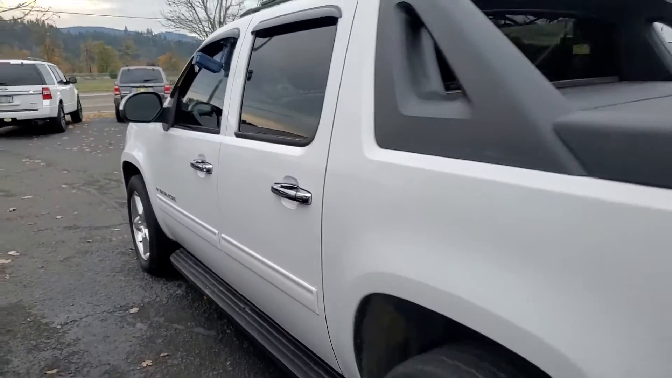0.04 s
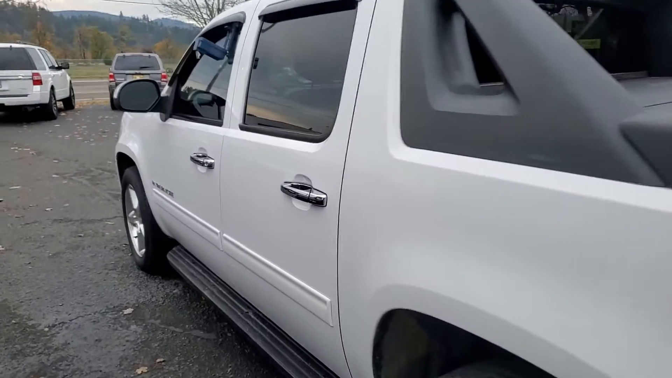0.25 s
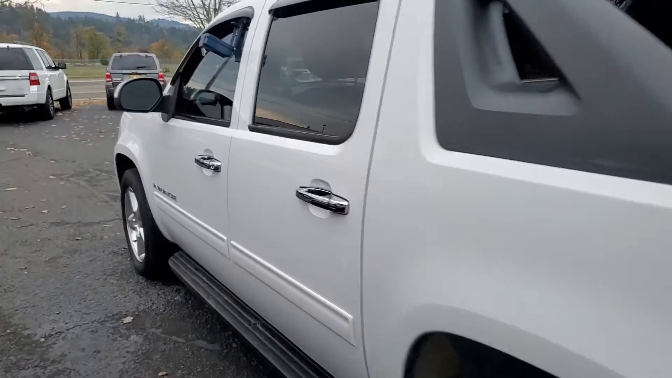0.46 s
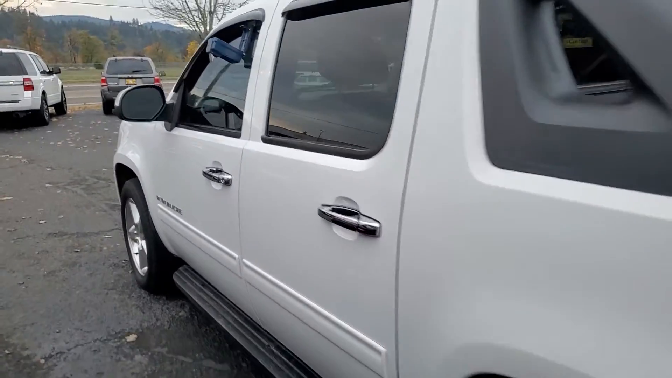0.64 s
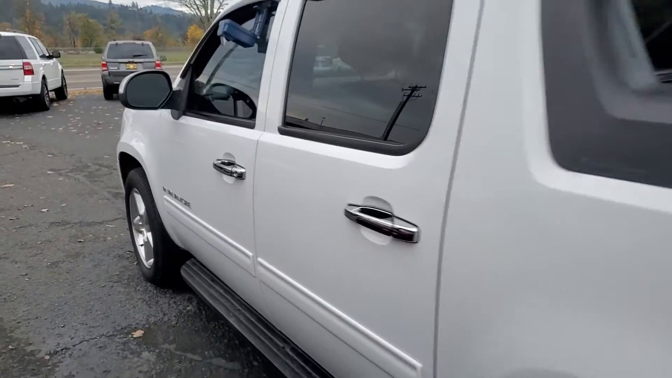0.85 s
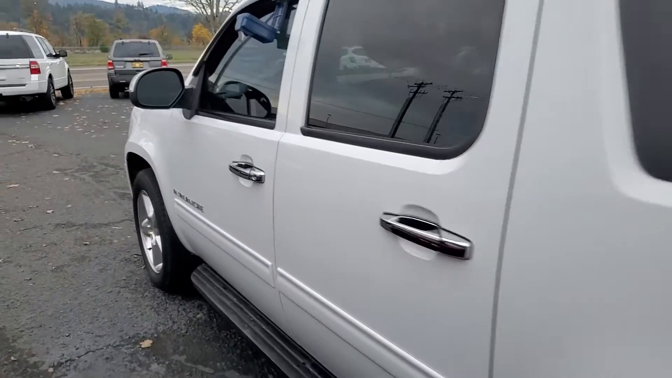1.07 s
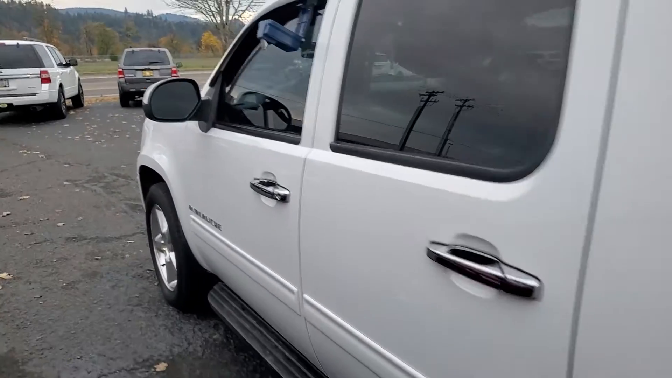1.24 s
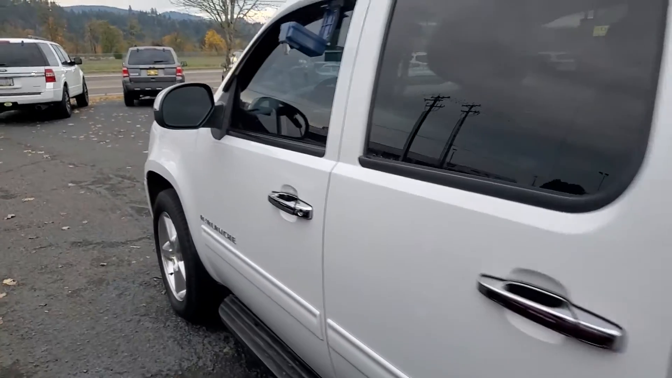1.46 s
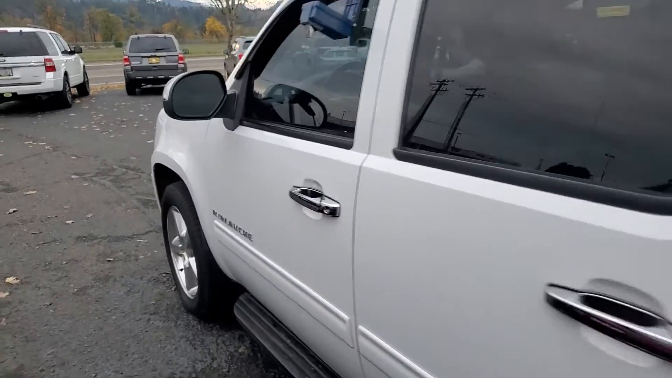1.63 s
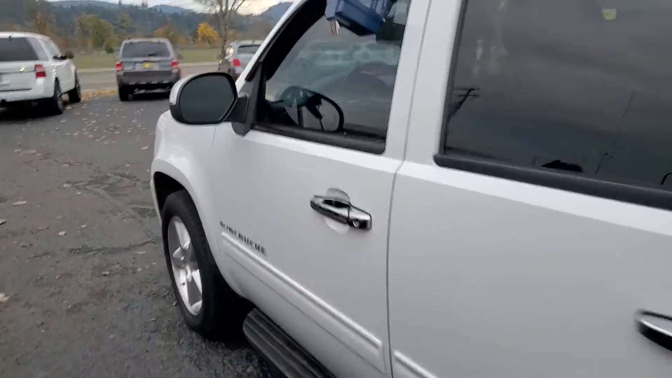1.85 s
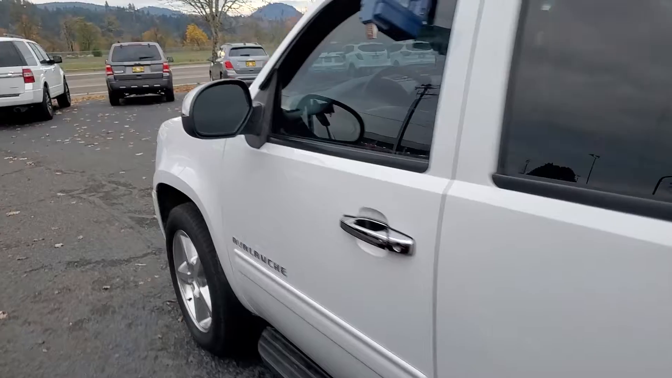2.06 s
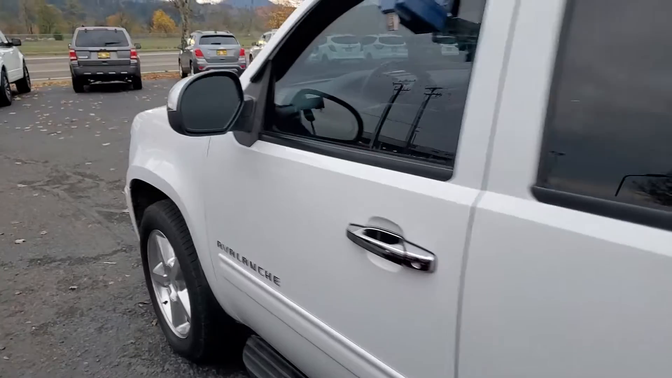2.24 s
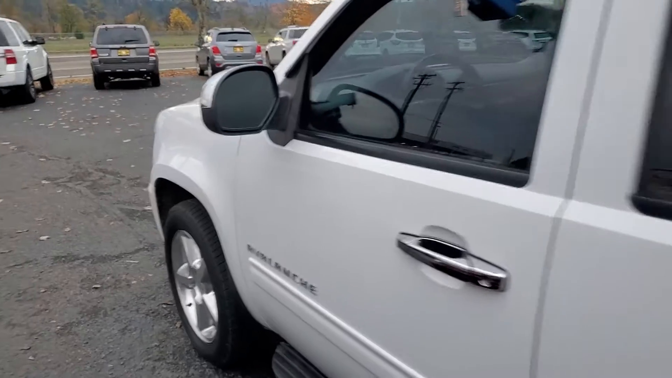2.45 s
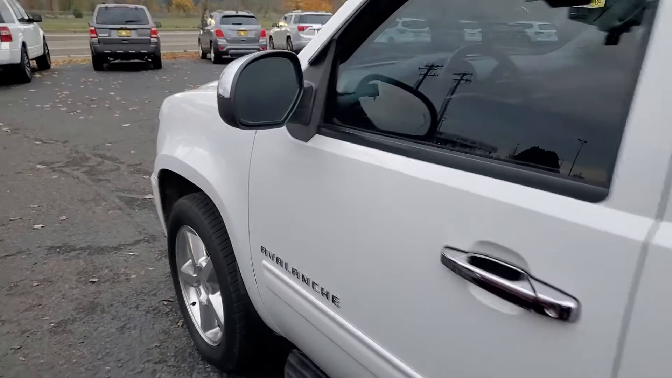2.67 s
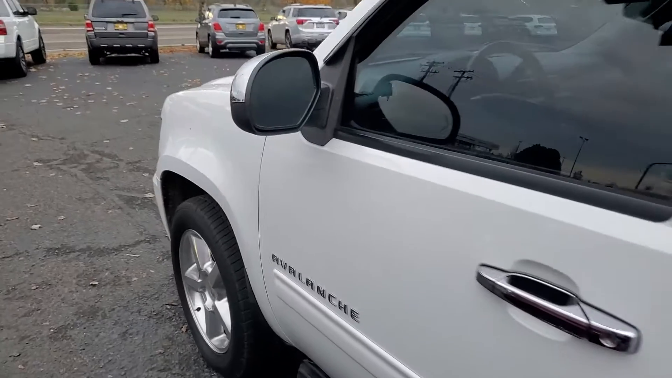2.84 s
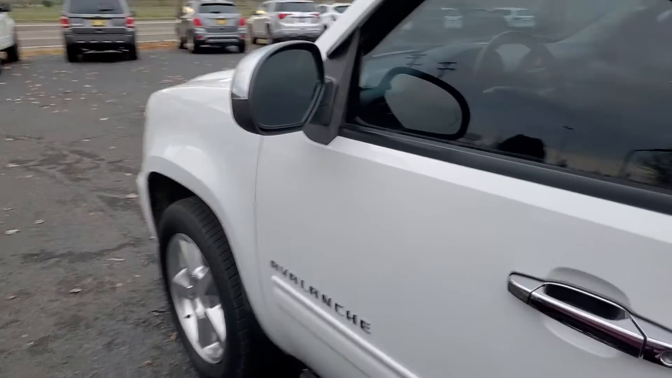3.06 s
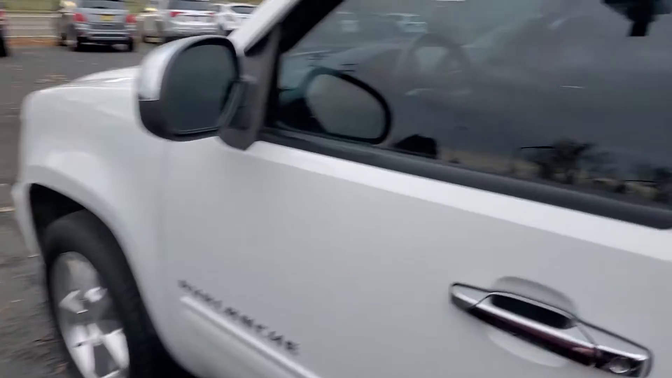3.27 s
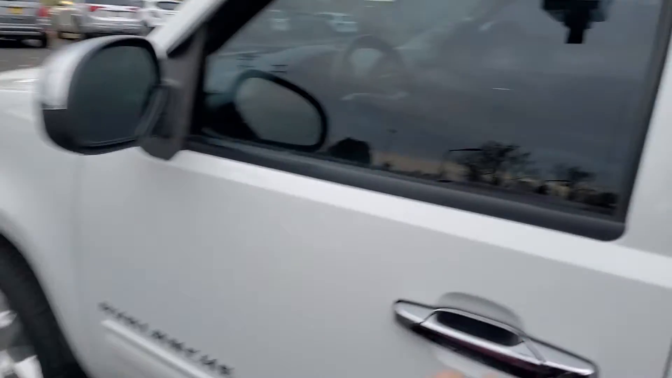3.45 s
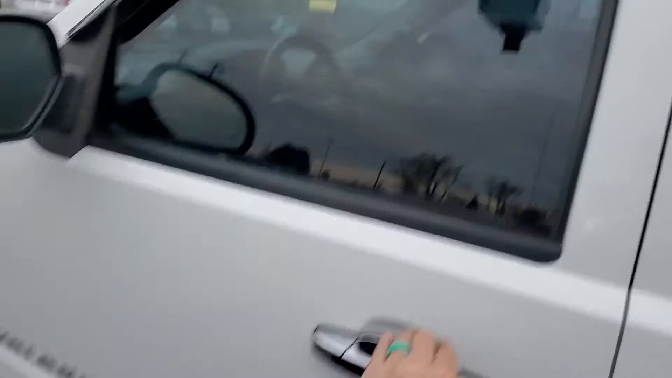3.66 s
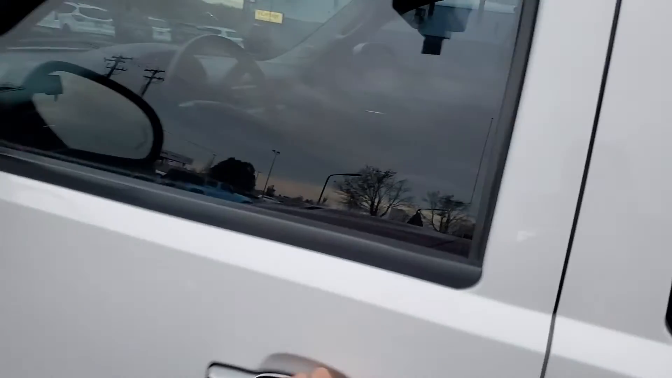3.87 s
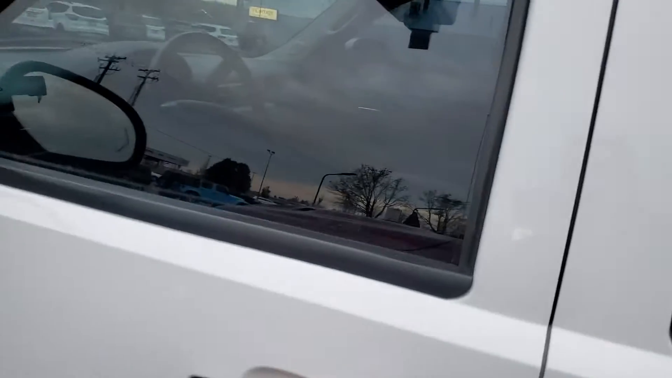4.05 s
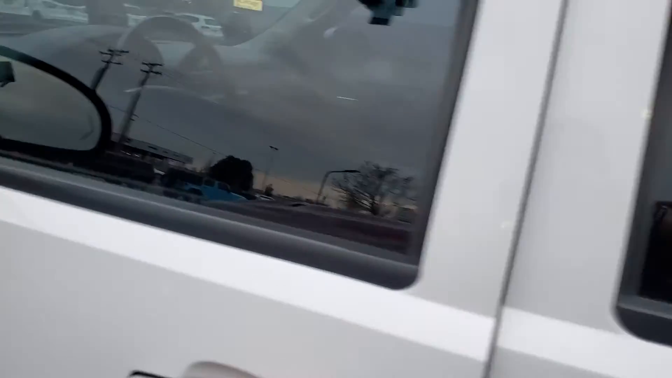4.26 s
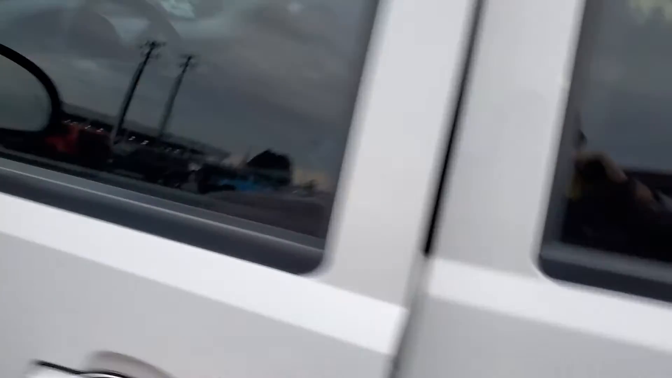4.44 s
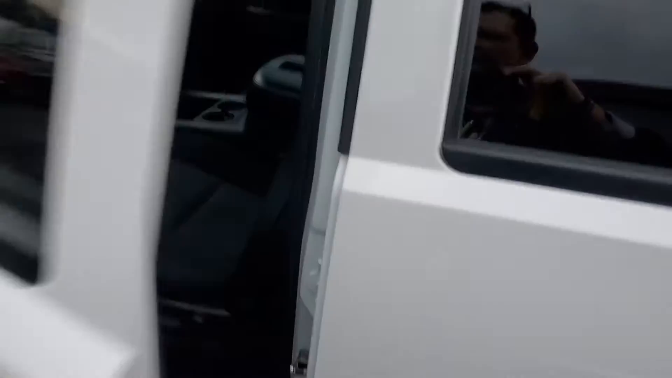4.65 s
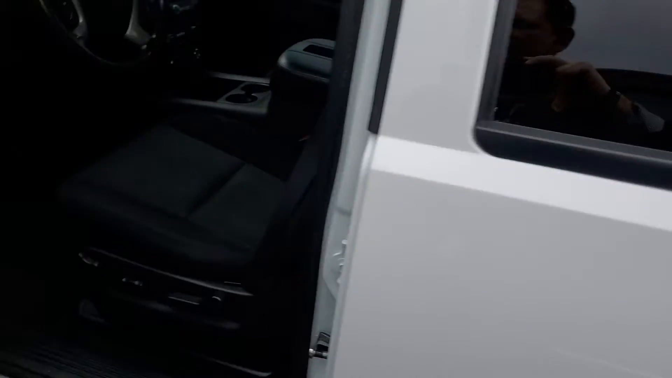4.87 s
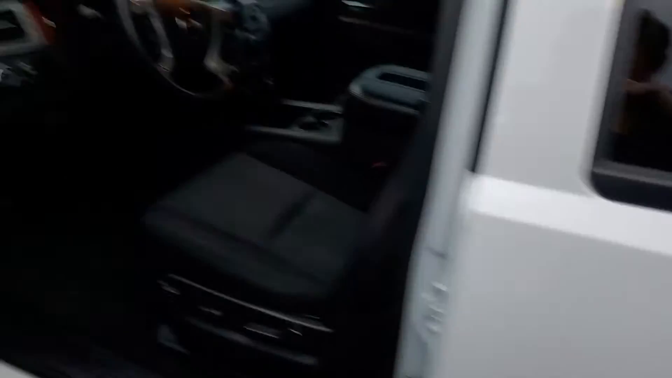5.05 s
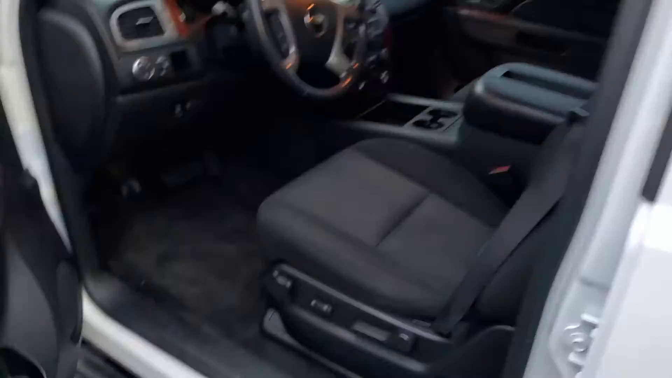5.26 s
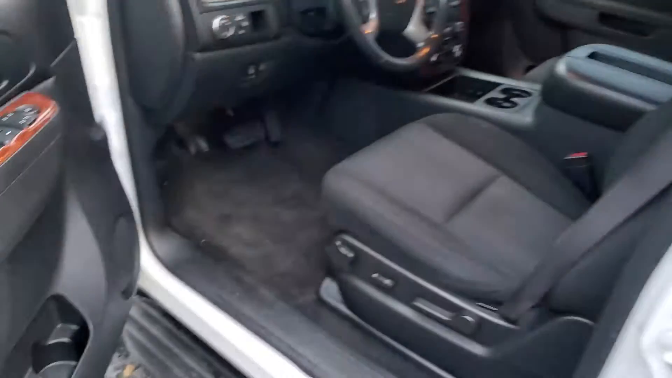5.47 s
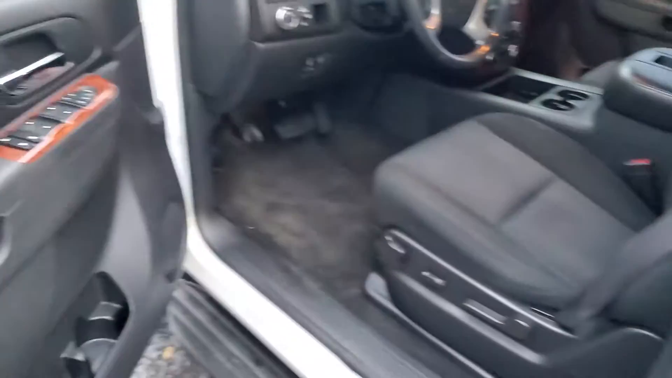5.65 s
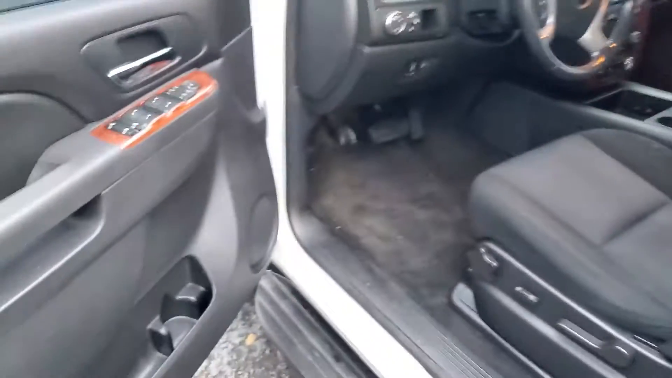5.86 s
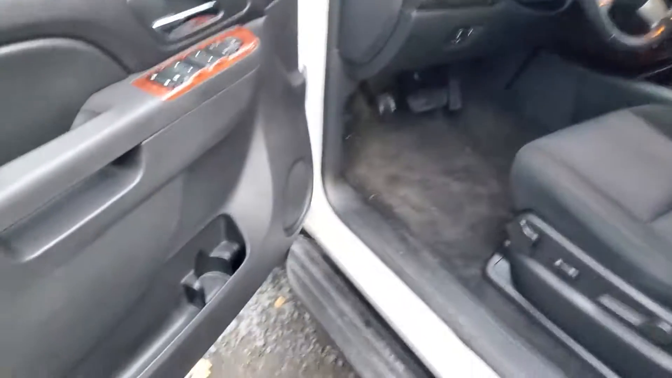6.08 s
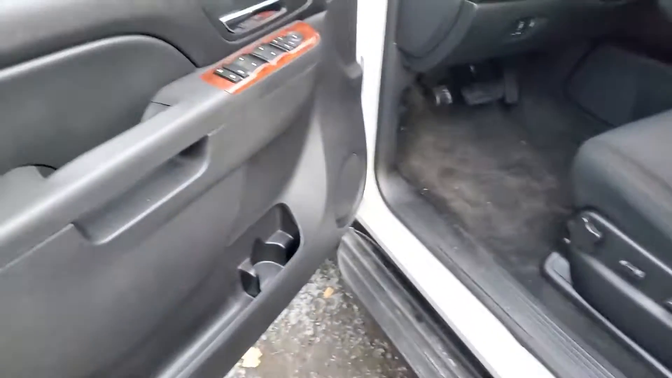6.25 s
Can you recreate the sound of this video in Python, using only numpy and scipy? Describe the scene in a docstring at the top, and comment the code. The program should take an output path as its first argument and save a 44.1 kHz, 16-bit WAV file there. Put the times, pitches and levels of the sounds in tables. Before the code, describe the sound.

Outdoor low road rumble and a passing engine, soft cloth rustle, thin squeaky whistles, one hard close click, then a door latch thud and a later metallic clack.

```python
"""An open lot by a road: a walk up to a parked pickup, clothes rustling and grit ticking under the shoes.
Close to the microphone, hard clicks ring short modes; at the pickup the handle is pulled, the latch lets go
with a thump and the swinging door clacks over its stop: struck modes with bursts of coloured noise.
Thin high whistles, gliding tones with a raspy haze, come and go. Far off, shaped noise makes the road's
rumble and tyre roar, and sine orders make two engines: one gains speed and fades, the other idles."""
import sys
import numpy as np
from scipy import signal
from scipy.fft import rfft, irfft, next_fast_len
from scipy.io import wavfile

SR = 44100
rng = np.random.default_rng(int(sys.argv[2]) if len(sys.argv) > 2 else 0)


def to_wav(s):
    """Save 16-bit WAV."""
    ch = np.atleast_2d(s).T  # columns
    pcm = np.round(np.clip(ch, -1, 1) * 32767)  # PCM
    wavfile.write(sys.argv[1], SR, pcm.astype(np.int16))


N = 278271
TIME = np.arange(N) / SR

# Hard clicks at the microphone, before the modes weigh them:
# (time [s], snap [dB], buzz [dB], knock of the case [dB], dull thud [dB])
CLICKS = [(1.4853, -33, -32, -54, -58), (1.492, -23.5, -26, -21, -19.5), (1.5003, -47, -42, -60, -62),
          (1.511, -44, -40, -60, -60), (1.5235, -48, -49, -60, -60), (1.5383, -28.5, -44, -60, -62),
          (1.549, -38, -50, -60, -60), (1.561, -6.5, -32, -18, -47)]
# Bright snap of a click: (frequency [Hz], level [dB], 60 dB decay [s])
SNAP_MODES = [(1710, -21, 0.0031), (2720, -1, 0.0034), (3700, 2, 0.0016), (5420, -7, 0.0029),
              (7200, -19, .003), (11500, -38, 0.0012)]
# Knock of the microphone's case: (frequency [Hz], level [dB], 60 dB decay [s])
CASE_MODES = [(542, 2, 0.024), (895, 1.5, 0.0074), (1400, -13.5, 0.004)]
# Dull thud of the case: (frequency [Hz], level [dB], 60 dB decay [s])
THUD_MODES = [(194, -2.5, 0.019), (373, 0, 0.016)]
# Blows on the door, relative levels:
# (time [s], panel [dB], low boom [dB], latch metal [dB], bright scrape [dB])
DOOR_BLOWS = [(4.269, -36, -26, -42, -50), (4.27, -39, -27, -42, -44), (4.3013, -23, -18.5, -27, -43),
              (4.3068, -17.5, -11, -33.5, -47), (4.3219, -26, -28, -50, -48), (4.342, -31, -18.5, -54, -50),
              (4.36, -35, -36, -60, -47), (4.4, -32, -42, -68, -62), (4.411, -32, -36, -68, -62),
              (4.839, -36, -48, -52, -45), (4.8998, -41, -30, -24, -23), (4.907, -29.5, -28, -36, -31),
              (4.9199, -27, -28, -67, -50)]
# The whole door flexing: (frequency [Hz], level [dB], 60 dB decay [s])
BOOM_MODES = [(47.8, -8, 0.13), (72.7, -8, 0.24), (129, -2, 0.093)]
# Door panel: (frequency [Hz], level [dB], 60 dB decay [s])
PANEL_MODES = [(147, 0.5, 0.041), (178, -4, 0.052), (214, 0, 0.053), (240, 1, 0.039), (300, -1, 0.038),
               (353.5, -5, 0.1), (417.6, -4.5, 0.092), (485, -10, 0.034), (574, -16, 0.083),
               (670, -11, 0.031)]
# Latch and striker: (frequency [Hz], level [dB], 60 dB decay [s])
LATCH_MODES = [(980, -1, 0.021), (1070, -7, .08), (1550, 2, 0.054), (1837, 4, 0.045), (1850, -2, 0.065),
               (1950, 0, 0.025), (2170, 5, 0.069), (3080, -16, 0.06)]
# Pawl grating over the striker: (frequency [Hz], level [dB], 60 dB decay [s])
CRACKLE_MODES = [(4240, -8, 0.0018), (5460, -11, 0.0013), (6350, -5, 0.002), (8000, -9, 0.0066)]
# Colour of the latch's crunch: (frequency [Hz], relative density [dB])
LATCH_COLOUR = [(400, 18.5), (700, 5.5), (1100, -1.5), (1500, 4), (2100, 3.5), (2700, -11), (3300, -2),
                (4200, -28), (6500, -22)]
# Bright scraping colour, for door, clicks and grit: (frequency [Hz], relative density [dB])
SCRAPE_COLOUR = [(1760, -44), (3000, 11), (4100, -1.5), (4580, 7.5), (5380, 6.5), (5810, 5.5), (8050, 8.5),
                 (8940, -4), (10500, 13), (13500, 4), (15800, -1)]
# Trim rattling inside the door: (frequency [Hz], relative density [dB])
TRIM_COLOUR = [(140, -11), (200, -6), (320, 7.5), (480, -3), (600, -9), (800, -14)]
# Steps and sleeve strokes: (middle time [s], half length [s], low swish [dB], fine hiss [dB])
STROKES = [(0.603, 0.091, -87, -68), (1.227, 0.08, -69, -65), (1.802, 0.18, -68.5, -62.5),
           (2.436, 0.11, -74, -67.5), (2.745, 0.055, -71, -64.5), (3.182, 0.12, -63.5, -61.5),
           (3.38, 0.085, -65, -71), (3.658, 0.27, -89, -63.5), (4.453, 0.75, -83, -67.5),
           (4.824, 0.31, -72, -62.5), (5.32, 0.25, -63, -65.5), (5.514, 0.049, -62.5, -66),
           (5.654, 0.057, -78, -61.5), (5.962, 0.089, -70, -61.5), (6.288, 0.1, -63, -62.5)]
# Low swish of cloth: (frequency [Hz], relative density [dB])
SWISH_COLOUR = [(1300, -34), (1800, 6), (2200, 2), (2650, -4), (3200, 0.5), (4200, -6.5), (5000, -7)]
# Fine hiss of cloth: (frequency [Hz], relative density [dB])
HISS_COLOUR = [(3800, 0), (4500, -3), (5200, -3), (6600, 1.5), (8000, 3), (9200, -10.5), (10500, -0.5),
               (11600, 3.5), (13000, -4.5), (15800, -10)]
# Grit under the shoes: (time [s], dull scuff [dB], bright tick [dB])
GRIT = [(0.554, -45.5, -58), (0.673, -77, -51.5), (1.195, -57, -52), (2.138, -64, -60), (2.529, -62, -55),
        (3.677, -55.5, -51), (5.544, -65, -56), (5.668, -55, -66), (6.045, -57, -54)]
# Dragging sole: (frequency [Hz], relative density [dB])
DRAG_COLOUR = [(900, 0), (1200, 3), (1500, -8)]
# Long whistles, relative levels:
# (left over right [dB], rasp [0-1], path of (time [s], pitch [Hz], level [dB]))
LONG_WHISTLES = [ (2.5, 0.44, [(1.29, 4590, -68), (1.36, 4330, -71), (1.48, 4350, -63), (1.54, 4340, -69)]),
                 (-7, 0.27, [(1.72, 4600, -72), (1.76, 4420, -51), (1.795, 4380, -44), (1.827, 4286, -51),
                 (1.855, 4232, -44), (1.887, 4241, -44), (1.903, 4329, -53), (1.931, 4209, -46),
                 (1.955, 4150, -60), (1.99, 4100, -65)]), (0, 0.55, [(2.01, 4400, -75), (2.07, 4440, -71),
                 (2.12, 4500, -78), (2.22, 4400, -66), (2.28, 4380, -72)]), (-1, 0.5, [(2.14, 4620, -71),
                 (2.2, 4700, -69), (2.29, 4660, -77), (2.38, 4830, -70), (2.45, 4680, -69),
                 (2.505, 4430, -64)]), (-2, 0.56, [(3.05, 4590, -76), (3.11, 4580, -54.5),
                 (3.145, 4600, -71), (3.165, 4200, -66), (3.26, 4250, -63), (3.33, 4270, -67),
                 (3.38, 4250, -66)]), (0, 0.78, [(4.75, 4580, -67), (4.765, 4150, -66), (4.8, 3920, -62),
                 (4.845, 4160, -62), (4.87, 3880, -62), (4.9, 4140, -59), (5.06, 4010, -70)]),
                 (-3, 0.25, [(4.86, 4300, -70), (4.93, 4360, -55), (5.02, 4380, -58), (5.08, 4370, -53.5),
                 (5.16, 4355, -58), (5.22, 4345, -57), (5.255, 4300, -59), (5.28, 4230, -71)]),
                 (1, 0.87, [(4.93, 3450, -75), (5.0, 3230, -67), (5.1, 3260, -81)]),
                 (1, 0.56, [(6.1, 4580, -76), (6.17, 4570, -66), (6.26, 4480, -69)])]
# Overtones of a long whistle: (multiple of the pitch [ratio], level [dB], left over right [dB])
LONG_OVERTONES = [(2, -25, 5), (3, -18, -8)]
# Short high slurs, relative levels: (level [dB], rasp [0-1], path of (time [s], pitch [Hz]))
SLURS = [ (-63, 0.8, [(0.0, 6000), (0.07, 5750)]), (-68, 0.8, [(0.125, 6100), (0.16, 5500)]),
         (-72, 0.2, [(0.39, 8880), (0.66, 8680)]), (-65, 1, [(0.79, 6750), (0.97, 6500)]),
         (-51, 0.45, [(1.23, 7000), (1.262, 7500), (1.28, 7620), (1.315, 8250), (1.338, 8550)]),
         (-57, 0.55, [(1.358, 6450), (1.372, 7350), (1.42, 8550)]), (-63, 0.6, [(1.572, 6250), (1.6, 6150),
         (1.64, 5850), (1.69, 5870), (1.73, 5700)]), (-58, 1, [(1.718, 4750), (1.77, 4480)]),
         (-65, 0.9, [(1.75, 3450), (1.805, 3630)]), (-61, 0.6, [(1.752, 5950), (1.77, 6220), (1.785, 6000),
         (1.8, 6250), (1.818, 5900)]), (-59, 0.9, [(1.828, 7850), (1.895, 7600)]),
         (-63, 0.6, [(1.872, 2900), (1.893, 2870)]), (-67, 0.6, [(1.985, 5600), (2.012, 5500)]),
         (-66, 0.6, [(2.135, 6050), (2.16, 5850)]), (-71, 0.5, [(2.168, 8350), (2.195, 8450)]),
         (-56, 0.5, [(2.208, 6200), (2.23, 5660), (2.25, 5880), (2.263, 6350), (2.274, 5950)]),
         (-65, 0.7, [(2.272, 6000), (2.292, 6500), (2.32, 6050), (2.345, 6350)]), (-63, 0.4, [(2.385, 9720),
         (2.432, 9700)]), (-63, 1, [(2.326, 3450), (2.34, 3300)]), (-62, 1, [(2.392, 3250), (2.408, 3550)]),
         (-57, 1, [(2.426, 3750), (2.44, 3450)]), (-65, 0.7, [(2.46, 7650), (2.52, 8450), (2.565, 8680)]),
         (-65, 1, [(2.52, 5450), (2.542, 5050)]), (-66, 0.35, [(2.578, 9550), (2.645, 9720), (2.71, 9300),
         (2.755, 9330), (2.8, 9050)]), (-55, 0.3, [(2.798, 8850), (2.855, 8150), (2.895, 8040),
         (2.922, 8300)]), (-68, 1, [(2.85, 3900), (2.89, 3550)]), (-62, 0.45, [(3.22, 7280), (3.32, 7780),
         (3.46, 8150)]), (-57, 0.6, [(3.445, 8100), (3.492, 8320), (3.508, 7700)]),
         (-66, 0.9, [(3.625, 7900), (3.675, 8700)]), (-63, 0.5, [(3.685, 7430), (3.745, 7520)]),
         (-56, 0.9, [(3.701, 4900), (3.711, 7000)]), (-60, 0.55, [(3.708, 8050), (3.725, 8150),
         (3.742, 7750)]), (-57, 0.9, [(3.74, 7700), (3.746, 6100), (3.752, 5900)]),
         (-60, 0.45, [(3.742, 7950), (3.785, 8400), (3.85, 8350), (3.905, 8640), (3.935, 8600)]),
         (-69, 1, [(3.882, 4250), (3.912, 4200)]), (-59, 0.85, [(3.914, 3800), (3.934, 3850)]),
         (-64, 1, [(3.941, 3750), (3.953, 3200)]), (-59, 0.4, [(3.922, 8050), (3.96, 7820), (4.02, 7620)]),
         (-69, 1, [(3.978, 3350), (3.992, 3400)]), (-67, 1, [(3.979, 4600), (3.991, 5000)]),
         (-60, 0.4, [(4.022, 7680), (4.145, 7960)]), (-54, 0.9, [(4.045, 7500), (4.05, 6700), (4.053, 5450),
         (4.058, 5350)]), (-58, 0.55, [(4.056, 6150), (4.07, 6050), (4.083, 5550), (4.102, 5850)]),
         (-56, 0.6, [(4.1, 6050), (4.118, 6150), (4.148, 5750), (4.168, 5650)]), (-66, 1, [(4.168, 5400),
         (4.2, 4950)]), (-68, 0.4, [(4.382, 10150), (4.405, 10400), (4.43, 10200)]),
         (-66, 0.8, [(4.69, 5900), (4.755, 5500)]), (-63, 0.8, [(4.8, 8350), (4.895, 7500)]),
         (-58, 0.9, [(5.038, 6400), (5.048, 7600)]), (-53, 0.35, [(5.052, 6450), (5.063, 6620),
         (5.074, 7420), (5.09, 7480), (5.1, 8050), (5.116, 8100)]), (-63, 1, [(5.115, 7600),
         (5.127, 5900)]), (-58, 0.3, [(5.127, 6480), (5.164, 6160), (5.17, 7400)]),
         (-55, 0.25, [(5.165, 7000), (5.173, 8380), (5.205, 7950), (5.228, 7950), (5.264, 7760)]),
         (-58, 0.35, [(5.195, 10000), (5.208, 10680), (5.25, 10420), (5.262, 10050), (5.285, 10000),
         (5.3, 9600)]), (-66, 0.7, [(5.5, 3700), (5.55, 4050)]), (-58, 0.6, [(5.607, 7150), (5.635, 6280),
         (5.672, 6370)]), (-60, 0.55, [(5.682, 8150), (5.725, 7950), (5.8, 8330)])]
# Side that a slur leans to at each pitch: (frequency [Hz], left over right [dB])
SLUR_LEAN = [(3500, -13.5), (5800, -2), (6400, -8), (7300, 7), (8400, 5.5), (9600, -6), (11000, -1)]
# Passing engine, relative level: (time [s], firing rate [Hz], level [dB])
ENGINE = [(0.0, 68.4, -30), (0.16, 70.3, -47), (0.31, 71.6, -27.5), (0.46, 75.3, -53), (0.58, 78.52, -31.5),
          (1.0, 82.8, -33.5), (1.7, 86.4, -31.5), (2.6, 88.0, -41), (3.1, 84.9, -58)]
# Orders of the passing engine: (multiple of the firing rate [ratio], level [dB])
ENGINE_ORDERS = [(1, -2), (1.5, -22), (2, -24.5)]
# Distant traffic, relative levels: (time [s], tyre roar [dB], upper roar [dB])
ROAD = [(0.0, -44.5, -49), (0.88, -45.5, -53), (2.25, -50.5, -57.5), (5.0, -49, -58.5), (5.39, -49.5, -56),
        (5.89, -50, -57), (6.12, -47.5, -53), (6.3, -47, -51.5)]
# Rumble of the road: (frequency [Hz], relative density [dB])
RUMBLE_COLOUR = [(22, -5), (31, -8), (40, 4.5), (50, -3.5), (60, 8.5), (72, 10.5), (86, 6), (100, -1.5),
                 (130, -28)]
# Low tyre roar: (frequency [Hz], relative density [dB])
ROAR_COLOUR = [(76, 8), (130, 1), (189, -3.5), (289, -5), (499, -12), (708, -16.5), (800, -19.5),
               (1040, -80), (1760, -120)]
# Upper tyre roar, also the colour of a scuff: (frequency [Hz], relative density [dB])
UPPER_ROAR_COLOUR = [(380, -3), (650, 2), (708, 2.5), (944, -3), (1150, -2), (1770, -9), (2480, -26),
                     (2800, -30), (3640, -77), (6160, -120)]
# A further car drawing near: (time [s], level [dB])
APPROACH = [(4.9, -86), (5.3, -63.5), (5.8, -67.5), (5.98, -52.5), (6.12, -71), (6.31, -60)]
# Its tyre hiss: (frequency [Hz], relative density [dB])
TYRE_HISS_COLOUR = [(1300, 2), (1600, 6), (2050, 3.5), (2400, -4.5)]
# Orders of the far idling engine: (multiple of the base rate [ratio], level [dB])
IDLE_ORDERS = [(2, -50.5), (3, -52), (4, -59.5)]
# Stereo width of every noise: (frequency [Hz], side over mid [dB])
WIDTH = [(30, -13), (60, -40), (95, -30), (150, -17), (240, -9.5), (380, -0.5), (600, 2.5), (950, 9),
         (1500, 3), (2380, 0), (3770, 1.5), (5980, 0.5), (9470, 0), (15000, 0)]
# Stereo balance of every noise: (frequency [Hz], left over right [dB])
LEAN = [(60, -0.5), (110, 0), (200, -3), (380, -1.5), (700, 0), (1290, -2), (2380, -2.5), (4400, -0.5),
        (8120, 2.5), (15000, -11)]


def clicks():
    """Close contacts ring snap and buzz over a fine rattle; the microphone's case knocks, late on the right."""
    times, snap_db, buzz_db, knock_db, thud_db = np.transpose(CLICKS)
    snap = struck(times, snap_db, SNAP_MODES, scatter_db=0.3)
    knock = struck(times, knock_db, CASE_MODES, scatter_db=1)
    knock = signal.sosfilt(signal.butter(2, 260, "high", fs=SR, output="sos"), knock)
    thud = sum(ring(taps(times, thud_db + db), hz, t60) for hz, db, t60 in THUD_MODES)

    # Tiny random touches between the clicks, and a noisy burst after each, ring a thin buzz.
    touches_per_s = 710
    touching = (TIME > times[0]) & (TIME < times[-1]) & (rng.random(N) < touches_per_s / SR)
    touch_level = from_db(-43) * touching + dying(times, snap_db - 34, t60=0.026)
    rattle = touch_level * rng.standard_normal((2, N))
    buzz = ring(taps(times, buzz_db) + rattle, hz=3450, t60=0.0057)

    treble_spit = dying(times, snap_db - 41, t60=0.0063) * noise(SCRAPE_COLOUR)
    return place(snap, 2.0, 0.06) + place(knock, 3.7, 0.71) + thud + buzz + treble_spit


def door():
    """Each blow rings the hollow door and the latch metal, with decaying crackle, scrape and a crunch of noise."""
    times, panel_db, boom_db, latch_db, scrape_db = np.transpose(DOOR_BLOWS)
    boom = struck(times, boom_db, BOOM_MODES, scatter_db=1.0)
    panel = boom - struck(times, panel_db, PANEL_MODES, scatter_db=3.0)
    panel = signal.sosfilt(signal.butter(2, 750, fs=SR, output="sos"), panel)  # cushioned by rubber
    latch = struck(times, latch_db - 18.0, LATCH_MODES, scatter_db=3.0)
    crunch = dying(times, latch_db - 8.5, t60=0.097) * noise(LATCH_COLOUR)
    scrape = dying(times, scrape_db - 8.5, t60=0.048) * noise(SCRAPE_COLOUR)

    trim_rattle = dying(times, panel_db - 10, t60=0.11) * noise(TRIM_COLOUR)
    more_crunch = dying(times, latch_db - 8.5, t60=0.093) * noise(LATCH_COLOUR)

    # The pawl grates over the striker in tiny random slips.
    slips_per_s = 1800
    slipping = rng.random(N) < slips_per_s / SR
    slips = slipping * rng.standard_normal((2, N)) * dying(times, latch_db - 18, t60=0.09)
    crackle = sum(from_db(db) * ring(slips, hz, t60) for hz, db, t60 in CRACKLE_MODES)

    metal = place(panel, -1.7, 0.15) + place(latch, -6.0, 0.061)
    return metal + crackle + crunch + scrape + trim_rattle + more_crunch


def walking():
    """Cloth noise swells with each stroke in uneven grains; grit scuffs and ticks as decaying noise."""
    swish, hiss = from_db(-68.5), from_db(-68.5)  # soft rustle between the strokes
    for middle, half, low_db, high_db in STROKES:
        swell = np.exp(-((TIME - middle) / half) ** 2)
        swish = np.hypot(swish, from_db(low_db) * swell)
        hiss = np.hypot(hiss, from_db(high_db) * swell)
    grain = from_db(1.54 * drift(corner_hz=37))
    cloth = grain * (swish * noise(SWISH_COLOUR) + hiss * noise(HISS_COLOUR))

    times, scuff_db, tick_db = np.transpose(GRIT)
    pebble_crunch = dying(times, scuff_db + 3.5, t60=0.034)  # as each scuff starts
    scuff = dying(times, scuff_db, t60=0.2) + pebble_crunch
    tick = dying(times, tick_db, t60=0.043)
    return cloth + scuff * noise(UPPER_ROAR_COLOUR) + tick * noise(SCRAPE_COLOUR)


def drag():
    """A sole scuffs softly over the asphalt: one smooth swell of coloured noise."""
    middle_s, half_s, level_db = 3.28, 0.22, -59.5
    swell = np.exp(-((TIME - middle_s) / half_s) ** 2)
    return from_db(level_db) * swell * noise(DRAG_COLOUR)


def whistles():
    """Thin high tones: long wavering whistles with overtones, and quick slurs on gliding pitch paths."""
    out = np.zeros((2, N))
    for pan_db, rasp, path in LONG_WHISTLES:
        hz, db = along(path)
        add_whistle(out, path[0][0], hz, db, rasp, [(0.99, 0, pan_db)] + LONG_OVERTONES)
    roundness = 0.31  # how roundly a slur swells and fades
    for db, rasp, path in SLURS:
        hz, = along(path)
        progress = (np.arange(len(hz)) + 0.5) / len(hz)
        arch_db = roundness * 20 * np.log10(np.sin(np.pi * progress))
        add_whistle(out, path[0][0], hz, db + arch_db, rasp, [(0.99, 0, at_hz(SLUR_LEAN, hz))])
    return out


def add_whistle(out, start, hz, level_db, rasp, partials):
    """Add one tone that swells and fades; rasp makes its pitch waver, its level flutter and its phase hazy."""
    first = max(round(start * SR), 0)
    age = np.arange(len(hz)) / SR

    def jitter(points_per_s):
        return np.interp(age * points_per_s, np.arange(2000), rng.standard_normal(2000))

    waver = rasp ** 2 * (0.016 * jitter(110) + 0.032 * jitter(900))
    turn = 2 * np.pi * np.cumsum(hz * (1 + waver)) / SR
    attack_s, release_s, gain_db = 0.0024, 0.0046, 4
    shape = np.minimum(age / attack_s, 1) * np.minimum(age[::-1] / release_s, 1)
    flutter_db = (1.4 + 2.6 * rasp) * jitter(170)
    swell = shape * from_db(level_db + gain_db + flutter_db)

    # A steady tone a quarter turn apart at the two ports gives way to a random haze at each.
    haze_share = 0.85 * rasp ** 3
    haze = np.array([jitter(400) + 1j * jitter(400) for port in range(2)]) / np.sqrt(2)
    ports = np.sqrt(1 - haze_share) * np.array([[1], [1j]]) + np.sqrt(haze_share) * haze
    tone = 0
    for multiple, db, pan_db in partials:
        gain = from_db(db + pan_db / 2 * np.array([[1], [-1]]))
        tone = tone + gain * np.imag(ports * np.exp(1j * multiple * turn))
    out[:, first:first + len(hz)] += swell * tone


def blur(x, t60, wet_db):
    """Scattered reflections trail a sound: convolution with decaying stereo noise."""
    age = np.arange(round(0.3 * SR)) / SR
    tail = rng.standard_normal((2, len(age))) * from_db(-60 * age / t60)
    tail /= np.linalg.norm(tail[0])
    return x + from_db(wet_db) * signal.fftconvolve(x, tail, axes=1)[:, :N]


def whine(hz, level_db):
    """A faint narrow whine, noise through a resonance, that fades during the walk."""
    fading = np.interp(TIME, [1.5, 3.4], [1, 0])
    return from_db(level_db) * fading * rms_one(ring(rng.standard_normal((2, N)), hz, t60=0.017))


def engine():
    """A passing engine's firing note with two weak orders above it follows its speed and level."""
    firing_hz, level_db = in_time(ENGINE)
    turn = 2 * np.pi * np.cumsum(firing_hz) / SR
    note = sum(from_db(db) * np.sin(multiple * turn) for multiple, db in ENGINE_ORDERS)
    heard = TIME <= 2.94  # already sunk low when it stops
    return np.sqrt(2) * from_db(level_db - 0.5) * heard * note


def road():
    """Far traffic: a lumpy rumble that swells at random, and the roar of tyres, all coloured noise."""
    roar_db, upper_db = in_time(ROAD)
    rumble = from_db(-41 + 2.0 * drift(corner_hz=1)) * noise(RUMBLE_COLOUR)
    roar = from_db(roar_db + 4) * noise(ROAR_COLOUR)
    upper_roar = from_db(upper_db + 0.5) * noise(UPPER_ROAR_COLOUR)
    return rumble + roar + upper_roar


def far_car():
    """Tyre hiss, coloured noise, grows unevenly as another car draws near."""
    level_db, = in_time(APPROACH)
    return from_db(level_db) * noise(TYRE_HISS_COLOUR)


def idler():
    """A far engine ticks over: a faint hum of sine orders on a wavering base rate."""
    base_hz, waver = 38.8, 0.013
    turn = 2 * np.pi * np.cumsum(base_hz * (1 + waver * drift(corner_hz=4.2))) / SR
    return np.sqrt(2) * sum(from_db(db) * np.sin(multiple * turn) for multiple, db in IDLE_ORDERS)


def breeze(level_db, top_hz):
    """Light air buffets each microphone port on its own: independent low noise with a shared drift in level."""
    band = signal.butter(2, [33, top_hz], "band", fs=SR, output="sos")
    lumps = signal.sosfilt(band, rng.standard_normal((2, N)))
    return from_db(level_db + 0.32 * drift(corner_hz=4.6)) * rms_one(lumps)


def from_db(db):
    """Decibels to gain."""
    return 10 ** (np.asarray(db) / 20)


def rms_one(x):
    """Scale to unit power."""
    return x / np.sqrt(np.mean(x ** 2) + 1e-20)


def in_time(rows):
    """Each column of a curve, at every sample."""
    s, *columns = np.transpose(rows)
    return [np.interp(TIME, s, c) for c in columns]


def along(rows):
    """Each column of a note's path, from its first point to its last, for at least 10 ms."""
    s, *columns = np.transpose(rows)
    moments = np.arange(s[0], max(s[-1], s[0] + 0.01), 1 / SR)
    return [np.interp(moments, s, c) for c in columns]


def at_hz(points, hz):
    """Read a spectrum on a log-frequency axis."""
    f, value = np.transpose(points)
    return np.interp(np.log(hz), np.log(f), value)


def drift(corner_hz):
    """Slow random movement of unit rms: noise that falls away above a corner frequency."""
    hz = np.arange(N // 2 + 1) * SR / N
    return rms_one(irfft(rfft(rng.standard_normal(N)) / (1 + (hz / corner_hz) ** 2), N))


def noise(spectrum):
    """Stereo noise of a given colour, as wide as the open air; rms 1 in the middle."""
    size = next_fast_len(N)
    hz = np.maximum(np.arange(size // 2 + 1) * SR / size, 1)
    outside = np.minimum(hz / spectrum[0][0], 1) * np.minimum(spectrum[-1][0] / hz, 1)
    colour = from_db(at_hz(spectrum, hz)) * outside ** 4  # rolls off beyond the end points
    mid, side = rfft(rng.standard_normal((2, size))) * colour
    signs = np.array([[1], [-1]])  # left, right
    pair = mid + signs * side * from_db(at_hz(WIDTH, hz))
    pair = pair * from_db(signs * at_hz(LEAN, hz) / 2)
    pair = irfft(pair, size)[:, :N]
    return pair / np.std(pair.mean(axis=0))


def taps(times, levels_db):
    """One impulse for each contact."""
    out = np.zeros(N)
    out[np.round(times * SR).astype(int)] = from_db(levels_db)
    return out


def ring(force, hz, t60):
    """A two-pole resonance: a unit impulse sets a decaying sine of height 1 ringing."""
    r, w = from_db(-60 / (t60 * SR)), 2 * np.pi * hz / SR
    return signal.lfilter([0, r * np.sin(w)], [1, -2 * r * np.cos(w), r * r], force + 1e-18)


def struck(times, levels_db, modes, scatter_db):
    """Each contact excites every mode with its own random strength; neighbouring modes swing opposite ways."""
    total = 0
    for k, (hz, db, t60) in enumerate(modes):
        strength_db = levels_db + db + scatter_db * rng.standard_normal(len(times))
        total = total + (-1) ** k * ring(taps(times, strength_db), hz, t60)
    return total


def dying(times, levels_db, t60):
    """Envelope that jumps at each contact and dies away exponentially."""
    return signal.lfilter([1], [1, -from_db(-60 / (t60 * SR))], taps(times, levels_db) + 1e-18)


def place(x, pan_db, lag_ms):
    """Set a sound between the ports: left over right level, and the delay of the right side."""
    left = x * from_db(pan_db / 2)
    right = np.interp(TIME - lag_ms / 1000, TIME, x) * from_db(-pan_db / 2)
    return np.array([left, right])


def scene():
    """Everything heard in the lot, near and far."""
    near = clicks() + door() + walking() + drag()
    high_tones = blur(whistles(), t60=0.15, wet_db=-10) + whine(hz=6910, level_db=-71.0)
    traffic = engine() + road() + far_car() + idler()
    return near + high_tones + traffic + breeze(level_db=-52.5, top_hz=96.0)


def record(dry):
    """The top is cut steeply above 15.9 kHz."""
    return signal.sosfilt(signal.ellip(10, 0.1, 80, 15900, fs=SR, output="sos"), dry)


dry = scene()
out = record(dry)
to_wav(out)
```